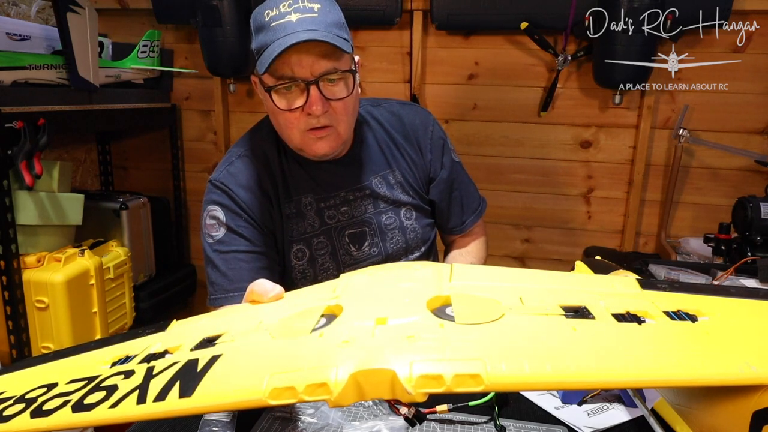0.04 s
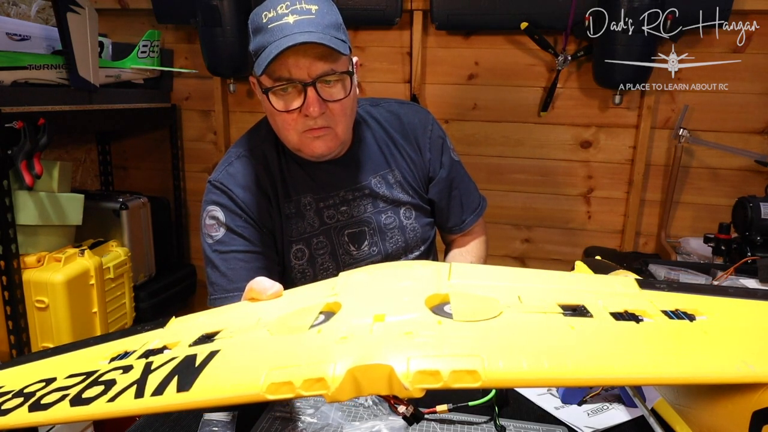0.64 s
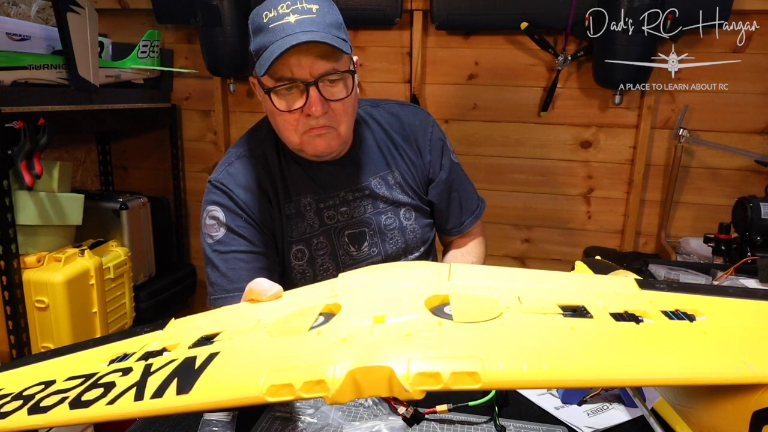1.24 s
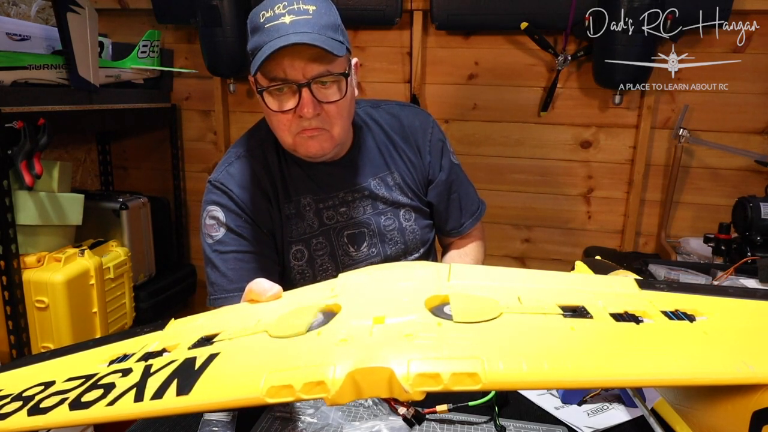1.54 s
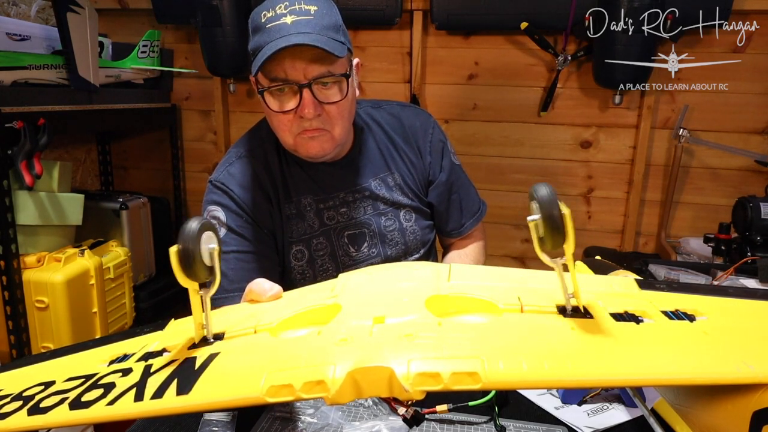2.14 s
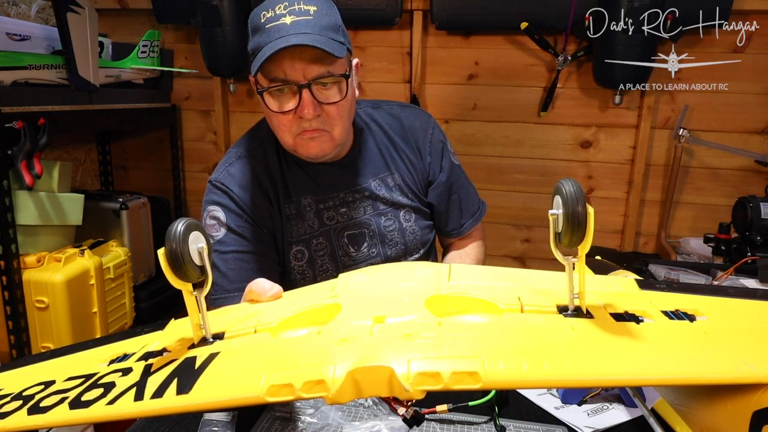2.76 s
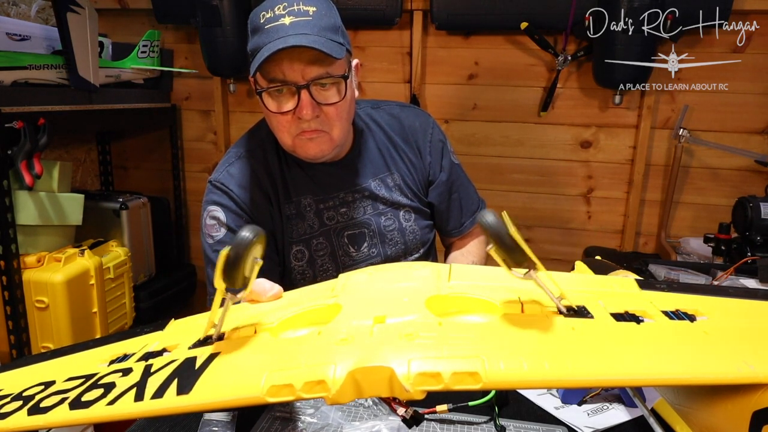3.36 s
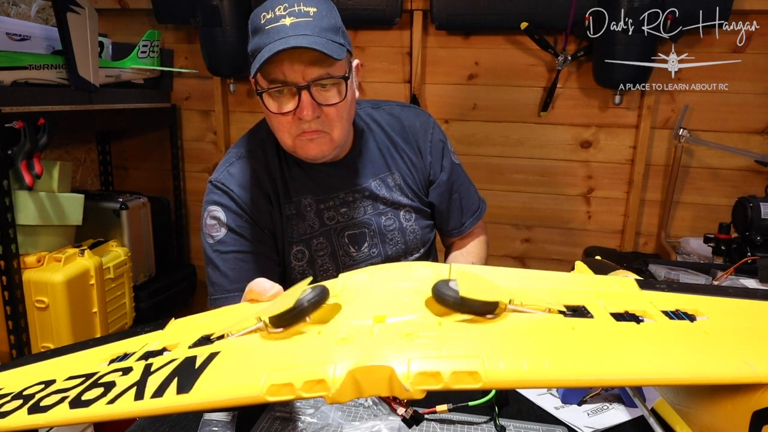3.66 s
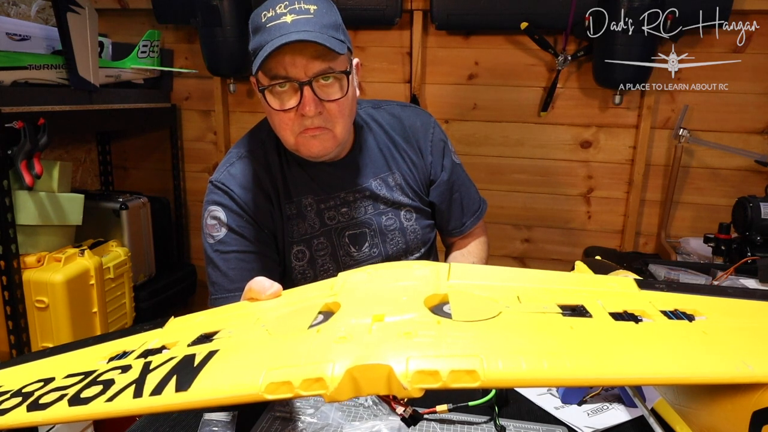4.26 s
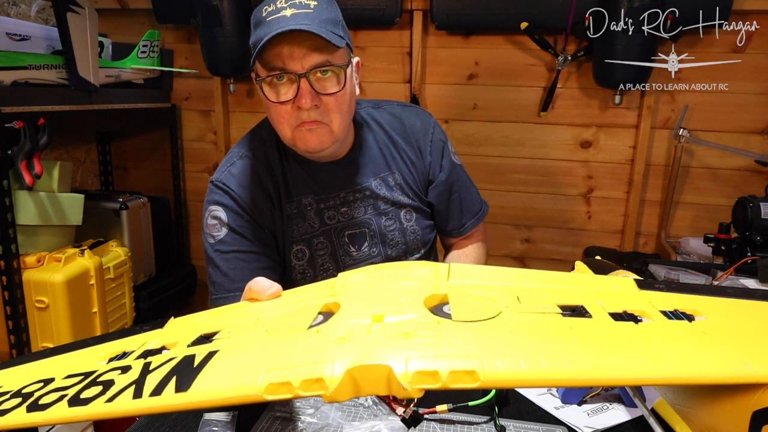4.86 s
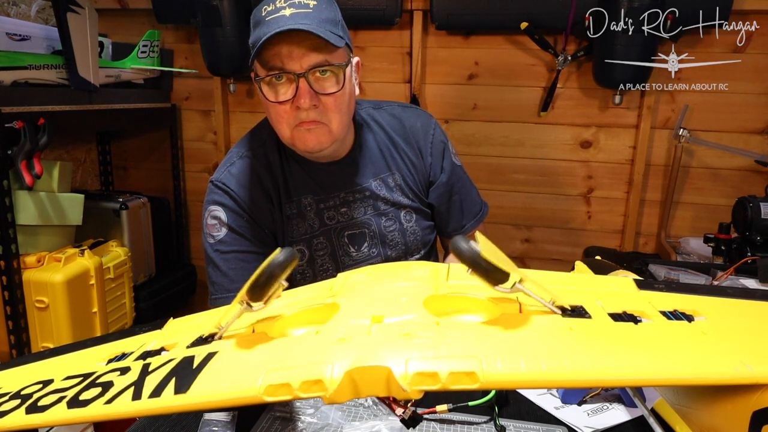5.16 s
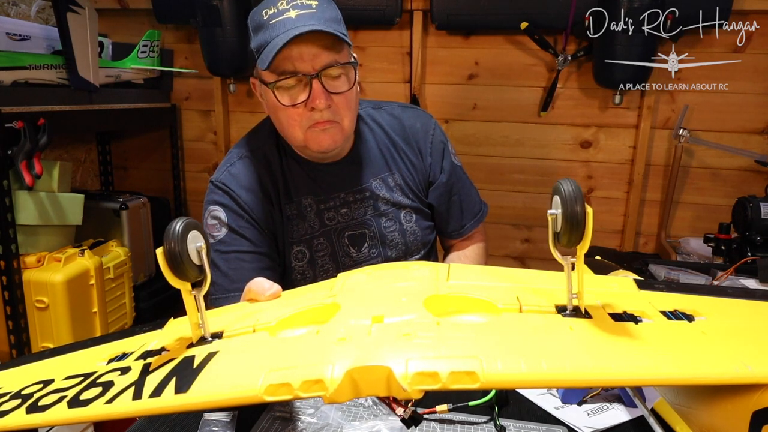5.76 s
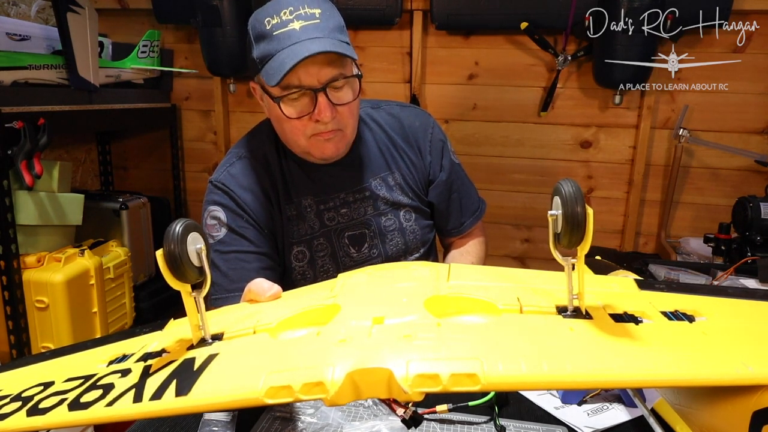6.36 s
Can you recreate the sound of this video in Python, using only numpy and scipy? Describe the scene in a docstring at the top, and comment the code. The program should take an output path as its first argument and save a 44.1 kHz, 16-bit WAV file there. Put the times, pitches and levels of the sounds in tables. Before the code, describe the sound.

In a quiet wooden workshop, a brief servo zip is followed by a pause, then the electric landing gear of a model plane extends with a throbbing, gritty whine and several clicks. It retracts with a more uneven whir, ending in a hollow bump and another zip, then extends again and starts back in. The sound is fairly close and mono, with slight room reflection and faint ticks from the held wing between runs.

```python
"""Model plane retracts in a wooden workshop

Two electric retract units swing the wheels of a foam plane out, in, out and start back in.
Each motor whines at harmonics of its shaft speed, beating against its twin, while tooth impacts
rattle in the hollow wing. Two quicker servos, probably for the gear doors, zip before the legs come
out and after they are stowed. Locks clack, pivots chirp and the wing thuds over a dull room tone."""
import sys
import numpy as np
from scipy import signal
from scipy.fft import rfft, irfft, next_fast_len
from scipy.io import wavfile
from scipy.ndimage import map_coordinates

SR = 44100
rng = np.random.default_rng(int(sys.argv[2]) if len(sys.argv) > 2 else 0)


def dump_mix(stems):
    """Bounce the given channels to the path in sys.argv[1] as a 16-bit WAV at rate SR."""
    frames = np.atleast_2d(stems).T  # one column per channel
    limited = np.clip(frames, -1, 1)  # hard clip at full scale
    pcm = np.round(limited * 32767).astype(np.int16)
    wavfile.write(sys.argv[1], SR, pcm)


N = 286902


def amp(db):
    """Decibels to amplitude ratio."""
    return 10 ** (np.asarray(db) / 20)


def unit(x):
    """Normalisation to rms 1."""
    return x / np.sqrt(np.mean(x ** 2) + 1e-20)


def along(points, hz):
    """Interpolation of (frequency, value) points on a logarithmic frequency axis."""
    f, v = np.transpose(points)
    return np.interp(np.log(hz + 1), np.log(f + 1), v)


def wobble(rate):
    """Smooth random modulation with rate knots a second."""
    return map_coordinates(rng.standard_normal(int(N * rate / SR) + 4), [np.arange(N) * rate / SR])


def filtered(x, response):
    """Linear filtering: the spectrum of x times a frequency response."""
    m = next_fast_len(N + SR // 2)
    return irfft(rfft(x, m) * response(np.fft.rfftfreq(m, 1 / SR)), m)[:N]


def coloured_noise(spectrum):
    """White noise shaped by a (frequency, level) spectrum, at rms 1."""
    return unit(filtered(rng.standard_normal(N), lambda hz: amp(along(spectrum, hz))))


def since(s):
    """Seconds elapsed after time s, zero before it."""
    return np.maximum(np.arange(N) / SR - s, 0)


def hump(s, width):
    """A Gaussian pulse of height 1 around time s."""
    return np.exp(-((np.arange(N) / SR - s) / width) ** 2)


def latest_stroke(rows):
    """Sample and hold: the columns of the latest stroke to have started."""
    rows = np.array(rows)
    return rows[np.maximum(np.searchsorted(rows[:, 0], np.arange(N) / SR) - 1, 0)].T


# background spectrum: (frequency [Hz], relative level [dB])
ROOM_SPECTRUM = [(15, -50), (25, -12), (35, -21), (62, 1), (119, -4), (156, -1.5), (246, -8.5), (289, -4.5),
                 (322, -7), (495, -7), (762, -2.5), (1110, -3.5), (1710, -8), (3260, -19.5), (15500, -37.5)]
# background envelope: (time [s], level [dB])
ROOM_LEVEL = [(0, -43.5), (.3, -45.5), (.9, -43), (1.35, -41.5), (2.7, -46), (3, -41.5), (4.3, -48.5),
              (4.55, -44.5), (6, -46), (6.35, -43.5)]


def room_tone():
    """Ambient noise, strongest at low frequencies, under slow amplitude modulation."""
    level_db = np.interp(since(0), *np.transpose(ROOM_LEVEL))
    return coloured_noise(ROOM_SPECTRUM) * amp(level_db + .47 * wobble(23))


# faint hum: (peak time [s], width [s], frequency [Hz], level [dB])
HUM = (0, 0.5, 156, -54.5)


def hum():
    """A low tone with random amplitude and phase modulation fades before the legs move."""
    s, width, hz, db = HUM
    envelope = amp(db + 2.5 * wobble(8)) * hump(s, width)
    return envelope * np.sin(2 * np.pi * hz * since(0) + .6 * wobble(12))


# swells of rubbing: (peak time [s], level [dB], rise [s], fall [s])
RUBS = [(1.1, -49.5, .5, .15), (1.24, -42.5, .05, .035)]


def rubbing():
    """Soft, low friction noise, perhaps from a hand shifting on the wing."""
    spectrum = [(30, -27), (90, -2), (170, -4), (290, -7.5), (450, -20), (2000, -49)]
    t = since(0)
    swell = sum(amp(db) * np.exp(np.minimum((t - s) / rise, (s - t) / fall))
                for s, db, rise, fall in RUBS)
    return swell * coloured_noise(spectrum)


# decay of the room: (frequency [Hz], reverberation time T60 [s])
WALL_DECAY = [(200, .3), (1500, 0.26), (4000, 0.19), (12000, 0.097)]


def workshop(x, wet_db):
    """Reverberation: reflections from wooden walls follow the direct sound, treble dying first."""
    hz, t, spectra = signal.stft(rng.standard_normal(SR // 2), SR, nperseg=256)
    tail = signal.istft(spectra * amp(-60 * t / along(WALL_DECAY, hz)[:, None]), SR, nperseg=256)[1]
    response = np.pad(tail, (SR // 250, 0)) / np.linalg.norm(tail)  # 4 ms delay
    echo = signal.fftconvolve(x, response)[:N]
    return (x + amp(wet_db) * echo) / np.hypot(1, amp(wet_db))


# chirps of the leg pivots: (time [s], frequency [Hz], level [dB])
SQUEAKS = [(1.662, 4200, -15), (1.666, 3750, -15), (3.239, 3900, -9), (5.012, 4120, -12.5)]


def squeaks(width_s):
    """Stick-slip friction: a pivot catches for a moment and gives a wavering tone."""
    t, waver = since(0), .49 * wobble(270)
    return sum(amp(db) * hump(s, width_s) * np.sin(2 * np.pi * hz * t + waver) for s, hz, db in SQUEAKS)


# legs and wheels striking the wing: (time [s], relative level [dB])
BUMPS = [(1.596, -19), (1.645, -24), (3.294, -19), (3.87, -7.5), (3.877, -8), (3.899, -23), (4.948, -21),
         (5.771, -28)]
# modes of the foam wing: (frequency [Hz], relative level [dB], T60 [s])
WING_MODES = [(129, -23.5, 0.051), (224, -3, 0.047), (311, 1, 0.045), (359, -15.5, .07), (456, 2, 0.043),
              (548, 1, 0.034), (692, -8, 0.099)]


def wing_bumps(cutoff_hz):
    """Modal ringing: soft blows excite the damped modes of a wing that radiates no deep bass."""
    thuds, t = np.zeros(N + SR), np.arange(SR // 4) / SR
    for s, db in BUMPS:
        ring = sum(amp(level + rng.normal(0, 1.7) - 60 * t / t60)
                   * np.sin(2 * np.pi * (hz * t + rng.random())) for hz, level, t60 in WING_MODES)
        ring *= 1 - np.exp(-t / .001)
        thuds[round(s * SR):][:len(t)] += amp(db) * ring / np.abs(ring).max()
    return filtered(thuds[:N], lambda hz: (1j * hz / (cutoff_hz + 1j * hz)) ** 2)


# faint ticks of the held airframe: (time [s], relative level [dB])
AIRFRAME_TICKS = [(0.389, -34.5), (0.545, -36), (0.907, -36), (1.309, -29), (2.849, -38), (4.639, -33),
                  (6.084, -33), (6.231, -31.5)]
# catches of the gear trains and leg locks: (time [s], relative level [dB])
CLACKS = [(1.4683, 1), (1.6906, 0.5), (2.1463, 0.5), (2.3164, 1.5), (2.4376, -1), (3.2287, 2.5),
          (3.238, -1.5), (3.894, 1)]
# spectrum of a contact: (frequency [Hz], relative level [dB])
IMPACT_SPECTRUM = [(80, -42.5), (400, -13), (1200, 4), (2200, 6.5), (4000, -3), (8000, -8.5), (15000, -18)]


def impacts(events, t60, cutoff_hz):
    """Impact noise: each contact is a decaying burst; softer contacts have a lower cutoff."""
    envelope, t = np.zeros(N + SR), np.arange(SR // 5) / SR
    for s, db in events:
        envelope[round(s * SR):][:len(t)] += amp(db - 60 * t / t60)
    cracks = envelope[:N] * rng.standard_normal(N)
    dulled = filtered(cracks, lambda hz: amp(along(IMPACT_SPECTRUM, hz)) / np.hypot(1, hz / cutoff_hz))
    return cracks.std() * unit(dulled)


def shaft(turns_hz, jitter, jitter_hz):
    """Shaft angle as the integral of a speed that trembles under load."""
    return 2 * np.pi * np.cumsum(turns_hz * (1 + jitter * wobble(jitter_hz))) / SR


def whine(angle, orders, flutter_db, flutter_hz):
    """Harmonics of the shaft rotation; level flutter grows with the order."""
    return unit(sum(amp(db + k * flutter_db * wobble(flutter_hz)) * np.sin(k * angle)
                    for k, db in orders))


PINION_TEETH = 9


def teeth(angle, scatter_db, grit):
    """Gear excitation: an impulse of random size for each pinion tooth, plus sliding noise."""
    strikes = np.diff(np.floor(PINION_TEETH * angle / (2 * np.pi)), prepend=0)
    impulses = strikes * rng.choice([-1, 1], N)
    impulses *= amp(scatter_db * np.clip(rng.standard_normal(N), -2, 2))
    return unit(impulses) + grit * rng.standard_normal(N)


def resonance(x, centre_hz, width_hz):
    """Forced response of one damped mode, at rms 1."""
    return unit(filtered(x, lambda f: 1j * f * width_hz / (centre_hz ** 2 - f ** 2 + 1j * f * width_hz)))


# servo runs: (start [s], spin-up [s], slower servo's unloaded mesh frequency [Hz], peak load time [s],
# its speed loss there [fraction], relative rattle level [dB], relative whine level [dB])
DOOR_STROKES = [(-.075, .014, 3270, .012, 0.26, -15, -13.5), (1.454, .016, 3254, 1.555, .19, -15, -10),
                (3.921, .005, 3519, 3.99, .15, -15, -11.5), (4.812, .015, 3420, 4.918, .18, -14.5, -10.5)]
DOOR_DRIVE_S, DOOR_RUN_S, DOOR_COAST_S = .12, .21, .0059  # full drive, whole run, decay after it
DOOR_ATTACK_S, DOOR_LOAD_S, DOOR_EASE_S = .0079, .036, .045  # onset, build-up and release of load
DROOP_DB_PER_S, RATTLE_BRAKE_DB_PER_S, WHINE_BRAKE_DB_PER_S = 14, 135, 277


def door_drive(fast_lead, fast_load_share):
    """Speed falls with torque: both servos spin up, sag under the door's load and fade out."""
    start, spin_s, free_hz, heaviest, sag, rattle_db, whine_db = latest_stroke(DOOR_STROKES)
    age, braking = since(start), since(start + DOOR_DRIVE_S)
    speed = free_hz * (1 - np.exp(-age / spin_s))
    load = sag * hump(heaviest, np.where(since(heaviest) > 0, DOOR_EASE_S, DOOR_LOAD_S))
    running = amp(-DROOP_DB_PER_S * age) * np.exp(-since(start + DOOR_RUN_S) / DOOR_COAST_S)
    onset = 1 - np.exp(-age / DOOR_ATTACK_S)
    rattle_gain = running * amp(rattle_db - RATTLE_BRAKE_DB_PER_S * braking) * onset
    whine_gain = running * amp(whine_db - WHINE_BRAKE_DB_PER_S * braking) * onset ** 3
    return speed * (1 + fast_lead - fast_load_share * load), speed * (1 - load), rattle_gain, whine_gain


# servo harmonics: (order [multiple of shaft speed], relative level [dB])
DOOR_ORDERS = [(1, -29), (3, -18), (5, -15), (6, -13), (9, 0), (18, -7.5), (27, -19)]
# servo gear noise: (frequency [Hz], relative level [dB])
DOOR_GEAR_SPECTRUM = [(200, -71.5), (700, -17), (1050, -5.5), (1500, 0.5), (1950, 6.5), (2500, 3.5),
                      (4100, 6), (5100, 2.5), (6200, -1), (8000, 0.5), (11000, -12.5), (13600, -7.5),
                      (15700, -20)]


def door_servos():
    """Gear mesh tones: two fast pinions sing at their tooth rate, roughened by random modulation."""
    fast, slow, rattle_gain, whine_gain = door_drive(fast_lead=.025, fast_load_share=.5)
    tones, rattle = np.zeros((2, N))
    for mesh_hz, share in ((slow, 1), (fast, .7)):
        angle = shaft(mesh_hz / PINION_TEETH, jitter=.011, jitter_hz=700)
        rasp = amp(2.6 * wobble(350))
        tones += share * rasp * whine(angle, DOOR_ORDERS, flutter_db=.13, flutter_hz=150)
        rattle += share * amp(2 * np.sin(angle)) * teeth(angle, scatter_db=1, grit=.99)
    rattle = unit(filtered(rattle, lambda hz: amp(along(DOOR_GEAR_SPECTRUM, hz))))
    singing = workshop(whine_gain * unit(tones), wet_db=-18)
    grinding = workshop(rattle_gain * rattle, wet_db=-11)
    return amp(1.63) * grinding + amp(-2.5) * singing


# leg runs: (start [s], stop [s], gears bite [s], direction [1 out, 0 in], fast motor's top whine [Hz],
# slow motor's top whine [Hz], fast motor's climb [Hz/s], relative rattle [dB], relative whine [dB])
LEG_STROKES = [(1.596, 2.453, 1.665, 1, 1526, 1422, 180, -14, -24),
               (3.089, 3.993, 3.227, 0, 1370, 1338, 0, -19, -19),
               (4.946, 5.776, 4.995, 1, 1524, 1447, 100, -14.5, -24),
               (6.435, 7.27, 6.58, 0, 1405, 1371, 0, -19, -16.5)]
LEG_SPIN_S, LEG_ATTACK_S, LEG_COAST_S, LEG_MUTE_S = .014, .0035, .017, .005
SLACK_DB, TAKE_UP_S = -14.5, .003  # rattle before the gears bite, time to engage
BITE_DB, BITE_S, BITE_SAG, BITE_SAG_S = 7.5, .0096, .06, .022  # burst of rattle, dip in speed
UPRIGHT_LEAD_S, UPRIGHT_S, UPRIGHT_DB, UPRIGHT_GAIN = .085, .05, -4.5, .02  # an upright leg runs light
LOCK_LEAD_S, LOCK_S, LOCK_SAG = .015, .04, .06  # then presses into its lock
RATTLE_FADE_DB_PER_S, WHINE_FADE_DB_PER_S = 5, 2.5  # as the load eases


def leg_drive(fast_load_share, slow_climb_share):
    """Load governs speed: swinging out, the motors take up slack, quicken, then slow at the lock."""
    start, stop, bite, outward, fast_hz, slow_hz, climb, rattle_db, whine_db = latest_stroke(LEG_STROKES)
    age, stopped = since(start), since(stop)
    spin = 1 - np.exp(-age / LEG_SPIN_S)
    engaged = 1 - np.exp(-since(bite) / TAKE_UP_S)
    slack = outward * (1 - engaged)
    drag_hz = climb * (1 - slack) * np.maximum(stop - start - age, 0)
    upright = outward * hump(stop - UPRIGHT_LEAD_S, UPRIGHT_S)
    lock = LOCK_SAG * outward * hump(stop - LOCK_LEAD_S, LOCK_S)
    speed_change = UPRIGHT_GAIN * upright - BITE_SAG * hump(bite + BITE_SAG_S, BITE_SAG_S)
    fast = spin * (fast_hz - drag_hz) * (1 + fast_load_share * speed_change - lock)
    slow = spin * (slow_hz - slow_climb_share * drag_hz) * (1 + speed_change - lock / 2)
    burst = engaged * np.exp(-since(bite) / BITE_S)
    load_db = SLACK_DB * slack + BITE_DB * burst + UPRIGHT_DB * upright
    load_db -= RATTLE_FADE_DB_PER_S * outward * age
    running = (1 - np.exp(-age / LEG_ATTACK_S)) * np.exp(-stopped / LEG_COAST_S)
    whine_gain = amp(whine_db - WHINE_FADE_DB_PER_S * age) * spin ** 3.5 * np.exp(-stopped / LEG_MUTE_S)
    return fast, slow, amp(rattle_db + load_db) * running, whine_gain, outward


# leg gear noise: (frequency [Hz], relative level [dB])
LEG_GEAR_SPECTRUM = [(100, -37.5), (350, -18), (600, -13), (800, -12), (1200, -0.5), (1600, -3.5),
                     (2300, 0.5), (3300, 1), (4500, 2), (6200, -2.5), (7900, -1), (11000, -12.5),
                     (13600, -10), (15700, -20)]
# modes of the gear housing: (frequency [Hz], width [Hz], boost [dB])
HOUSING_MODES = [(1370, 257, 10), (1804, 115, 10.5), (3650, 200, 2), (4100, 280, 1.5), (5220, 160, 4)]


def gearbox_response(hz):
    """Structural resonance: the housing's modes raise peaks on the broad gear spectrum."""
    peaks_db = sum(db / (1 + (2 * (hz - centre) / width) ** 2) for centre, width, db in HOUSING_MODES)
    return amp(along(LEG_GEAR_SPECTRUM, hz) + peaks_db)


# motor harmonics: (order [multiple of shaft speed], relative level out [dB], relative level in [dB])
LEG_ORDERS = [(1, -10.5, -17.5), (2, -19, -20.5), (3, 1.5, -0.5), (4, -10, -16), (5, -22, -16.5),
              (8, -18, -25.5), (11, -19, -25), (15, -17, -28)]


def leg_motors():
    """Beating: two geared motors run slightly apart, each throbbing once a reduction wheel turn."""
    fast, slow, rattle_gain, whine_gain, outward = leg_drive(fast_load_share=.3, slow_climb_share=.7)
    orders = [(k, in_db + outward * (out_db - in_db)) for k, out_db, in_db in LEG_ORDERS]
    tones, rattle, mesh = np.zeros((3, N))
    for whine_hz, tightness in ((fast, .6), (slow, 1)):  # the slower unit has tighter, noisier gears
        drift = 1 + .004 * wobble(9)
        angle = shaft(whine_hz / 3 * drift, jitter=.002, jitter_hz=249.9)  # 3 commutator beats a turn
        throb_db = (1.1 + .93 * outward) * np.sin(angle / 13)  # 13:1 reduction
        tones += whine(angle, orders, flutter_db=.2837, flutter_hz=70.3)
        mesh += tightness * amp(3 * throb_db) * np.sin(PINION_TEETH * angle + .9 * wobble(250))
        tooth_load_db = throb_db + 2.4 * np.sin(angle) + 2.2 * wobble(160)
        rattle += tightness * amp(tooth_load_db) * teeth(angle, scatter_db=3.5, grit=.71)
    rattle = unit(filtered(rattle, gearbox_response))
    # the mesh tone sings out where it meets a mode of the frame
    mesh = amp(-12) * rattle_gain * resonance(mesh, centre_hz=4170, width_hz=280)
    # folding in, the weight of the legs pulls the gears unevenly through their play
    chug = (1 - outward) * wobble(45)
    singing = workshop((whine_gain * unit(tones) + mesh) * amp(2.1 * chug), wet_db=-20)
    grinding = workshop(rattle_gain * rattle * amp(.9 * chug), wet_db=-9.5)
    return amp(-.78) * grinding + amp(1.5) * singing


def scene():
    """Superposition of motors, contacts and background at one microphone, alike in both channels."""
    clacks = amp(-10.5) * impacts(CLACKS, t60=.035, cutoff_hz=12000)
    ticks = amp(-7.5) * impacts(AIRFRAME_TICKS, t60=.084, cutoff_hz=1800)
    contacts = clacks + ticks + amp(-2) * wing_bumps(cutoff_hz=90) + squeaks(width_s=.0092)
    mono = leg_motors() + door_servos() + workshop(contacts, wet_db=-8) + rubbing() + hum() + room_tone()
    return np.array([mono, mono])


def record(dry):
    """Hard clipping at full scale, then steep band limiting at 15750 Hz."""
    low_pass = lambda hz: np.clip((15750 - hz) / 200 + .5, 0, 1)
    return np.array([filtered(channel, low_pass) for channel in np.clip(dry, -1, 1)])


dry = scene()
out = record(dry)
dump_mix(out)
```